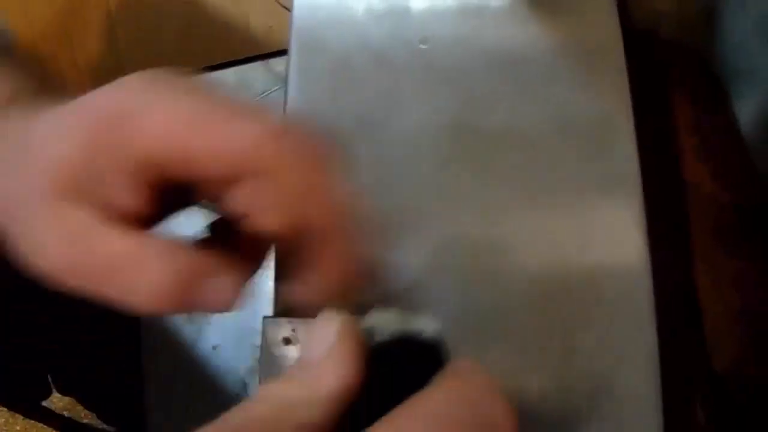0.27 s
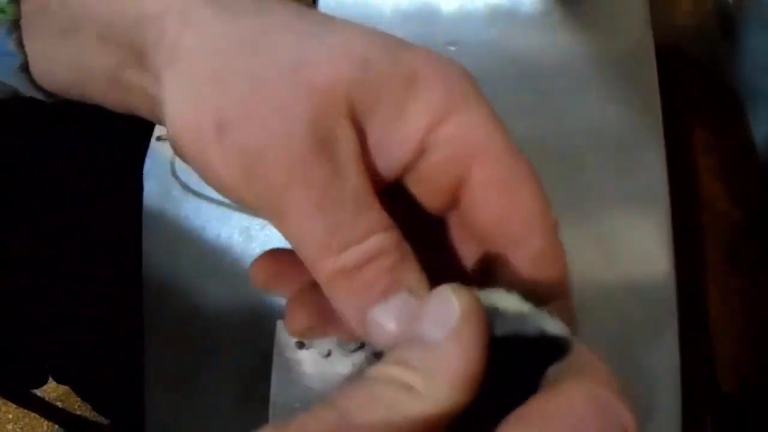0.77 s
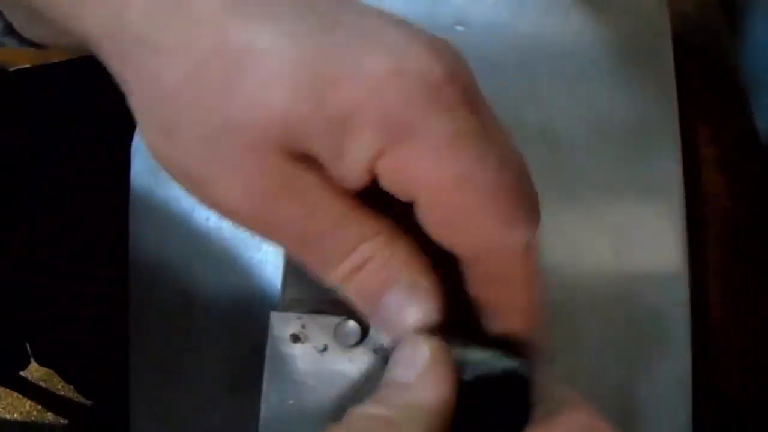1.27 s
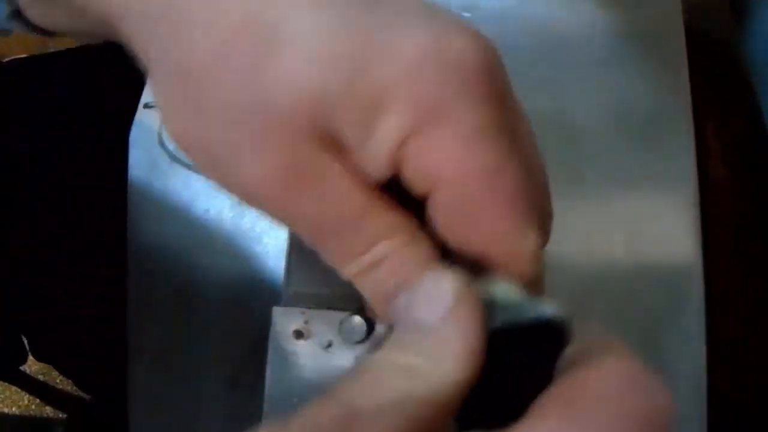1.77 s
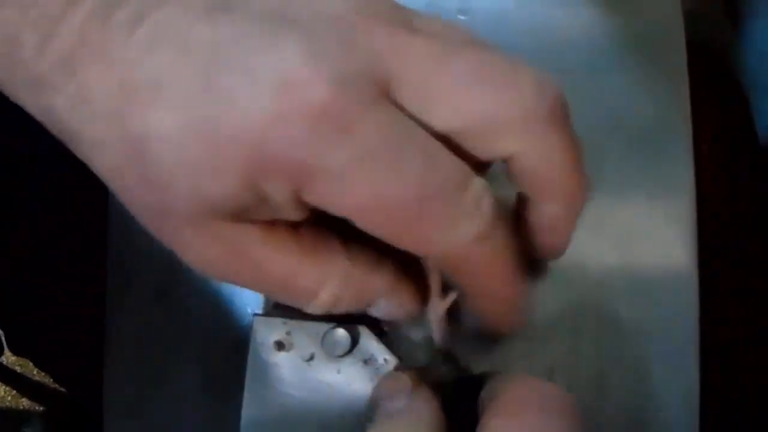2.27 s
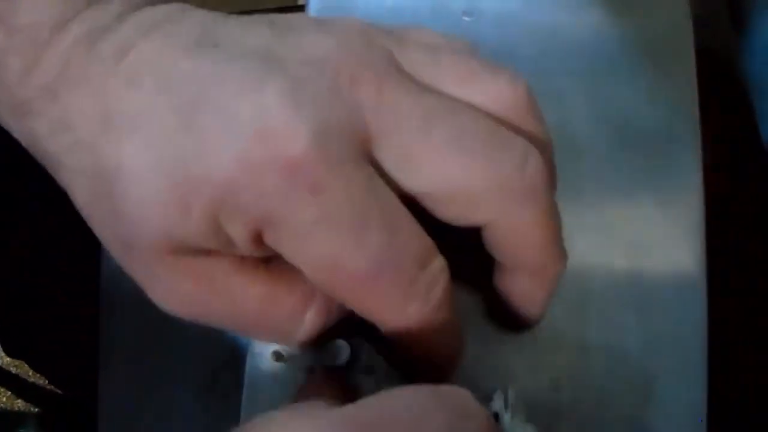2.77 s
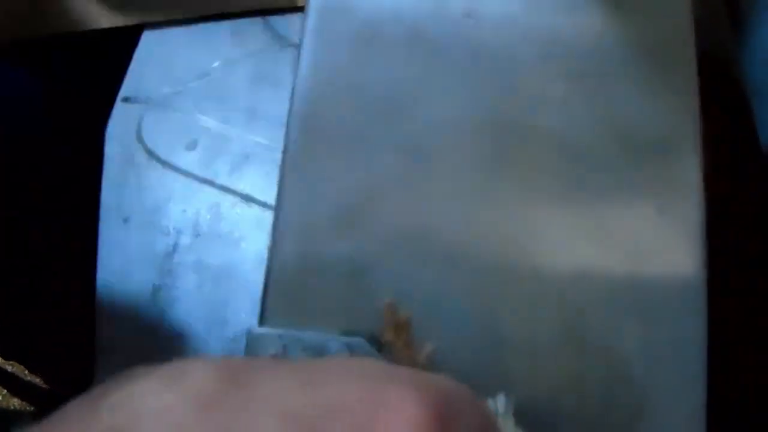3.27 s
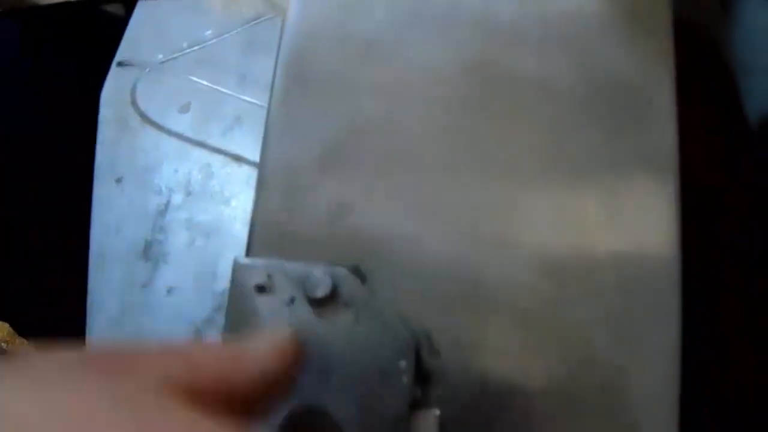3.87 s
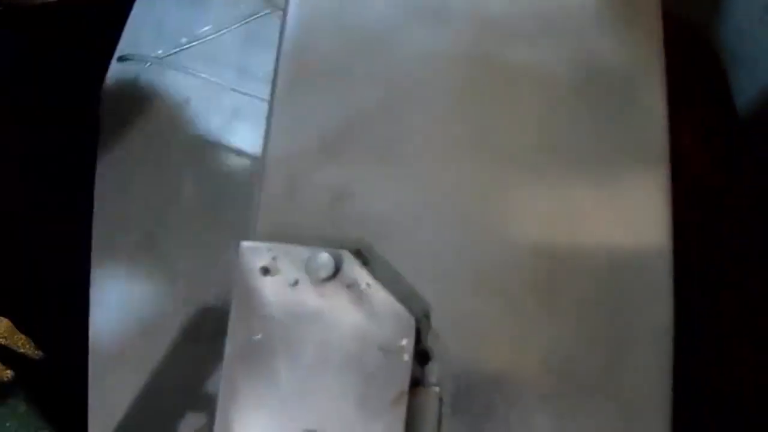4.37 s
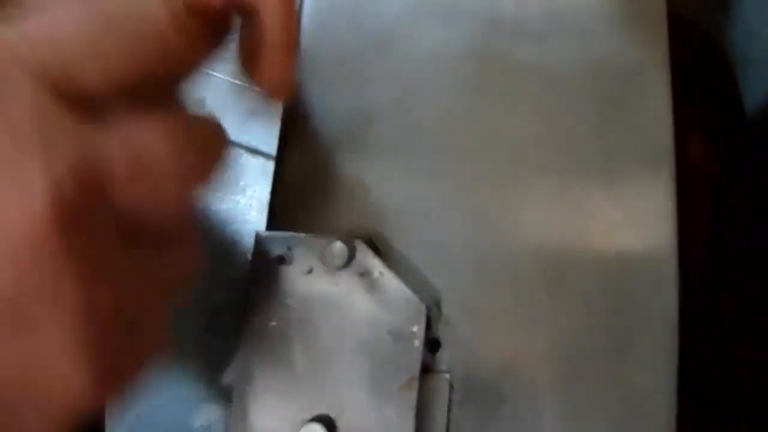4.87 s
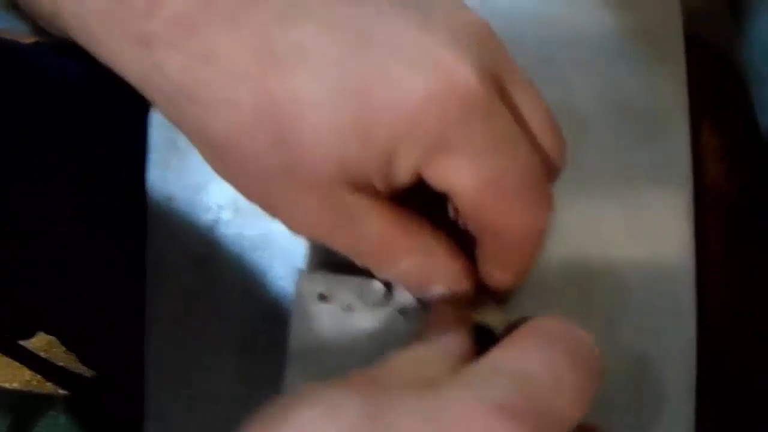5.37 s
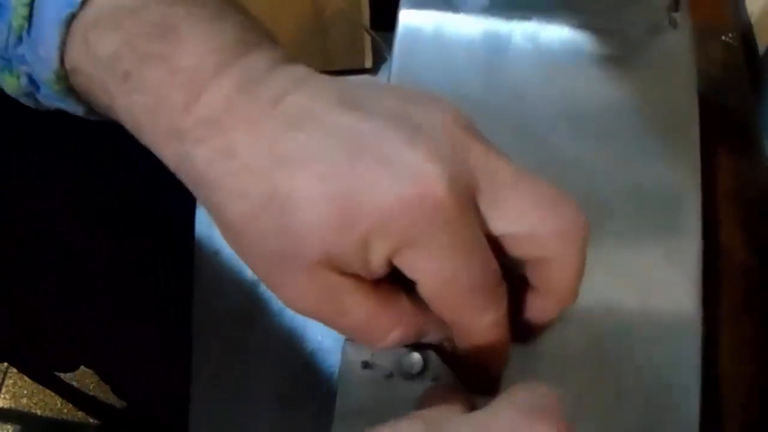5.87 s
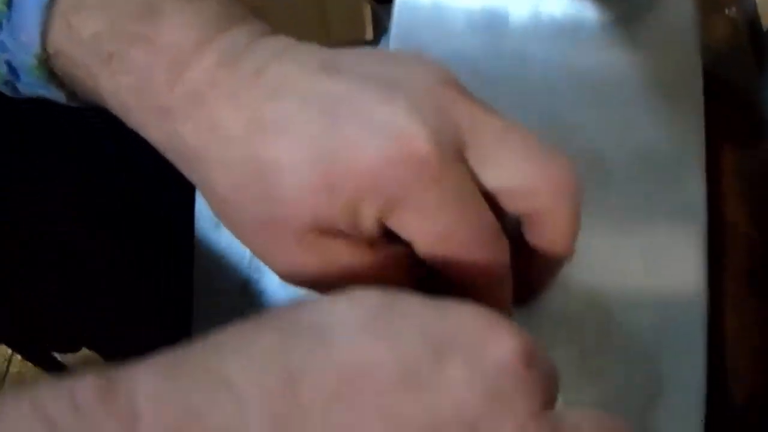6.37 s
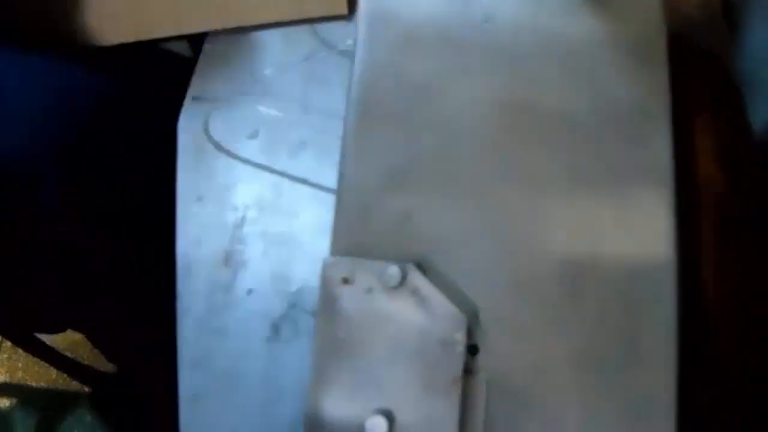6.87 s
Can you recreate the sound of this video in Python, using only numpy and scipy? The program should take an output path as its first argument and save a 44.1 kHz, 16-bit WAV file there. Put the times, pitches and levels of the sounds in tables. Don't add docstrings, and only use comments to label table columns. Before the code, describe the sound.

Thin falling chick whistles and hoarse squeezed cries over a faint flock, as hands rustle, bump cardboard and rap a metal bench indoors.

```python
import sys
import numpy as np
from scipy import signal
from scipy.fft import rfft, irfft, next_fast_len
from scipy.io import wavfile

SR = 44100
rng = np.random.default_rng(int(sys.argv[2]) if len(sys.argv) > 2 else 0)


def unload_audio(sound):
    columns = np.transpose(np.atleast_2d(sound))
    steps = np.round(np.clip(columns, -1, 1) * 32767)
    wavfile.write(sys.argv[1], SR, steps.astype(np.int16))


def ratio_of_db(decibels):
    return 10 ** (np.asarray(decibels, float) / 20)


N = 314433


def rms_one(x):
    return x / np.sqrt(np.mean(x ** 2) + 1e-20)


def drift(rate_hz, size=N):
    r = np.exp(-2 * np.pi * rate_hz / SR)
    noise = rng.standard_normal(size + 9000)
    return rms_one(signal.lfilter([1], [1, -2 * r, r * r], noise)[9000:])


def at_hz(points, hz):
    table_hz, value = np.transpose(points)
    return np.interp(np.log(hz), np.log(table_hz), value)


def coloured(x, spectrum):
    size = next_fast_len(len(x))
    hz = np.maximum(np.fft.rfftfreq(size, 1 / SR), 10)
    return rms_one(irfft(rfft(x, size) * ratio_of_db(at_hz(spectrum, hz)), size)[:len(x)])


def filtered(x, order, hz, kind="low"):
    return signal.sosfilt(signal.butter(order, hz, kind, fs=SR, output="sos"), x)


def resonance(x, hz, width_hz):
    r = np.exp(-np.pi * width_hz / SR)
    poles = [1, -2 * r * np.cos(2 * np.pi * hz / SR), r * r]
    return signal.lfilter([(1 - r * r) / 2, 0, (r * r - 1) / 2], poles, x)


def bursts(events, rise_s, t60_s):
    out = np.zeros(N + SR)
    age_s = np.arange(SR) / SR
    for start_s, level_db in events:
        out[round(start_s * SR):][:SR] += ratio_of_db(level_db - 60 * age_s / t60_s) * np.clip(age_s / rise_s, 0, 1)
    return out[:N]


# frequency in Hz, level in dB per Hz.
AIR = [(18, -67), (30, -7), (148, 1.5), (197, -7.5), (256, -5), (606, -9.5), (1550, -23), (3590, -8),
       (6210, -64), (9680, -8), (15500, -55)]
# frequency in Hz, level in dB rms.
HUM = [(199.6, -50.5), (400, -67), (2000, -64.5), (2200, -80)]
# frequency in Hz, width in Hz, level in dB rms.
FAN = [(39.2, 11, -51), (137, 23, -65)]


def background():
    t = np.arange(N) / SR
    out = ratio_of_db(-49) * coloured(rng.standard_normal(N), AIR)
    for hz, level_db in HUM:
        out += np.sqrt(2) * ratio_of_db(level_db + 1.2 * drift(5.5)) * np.sin(2 * np.pi * hz * t)
    noise = rng.standard_normal(N)
    for hz, width_hz, level_db in FAN:
        drone = resonance(resonance(noise, hz, width_hz), hz, width_hz)
        out += ratio_of_db(level_db) * rms_one(drone)
    return out


def room(x, far):
    t60_s, tail_db, early_db = 0.27, -11.5, -15
    t = np.arange(int(.8 * SR)) / SR
    tail = rng.standard_normal(len(t)) * ratio_of_db(-60 * t / t60_s) * np.clip(t / 0.012, 0, 1)
    tail = filtered(tail, 1, 6500)
    early = rng.standard_normal(len(t)) * ratio_of_db(-60 * t / .07) * (rng.random(len(t)) < .2)
    tail, early = tail / np.linalg.norm(tail), early / np.linalg.norm(early)
    diffuse = signal.fftconvolve(ratio_of_db(tail_db) * x + far, tail)
    close = ratio_of_db(early_db) * signal.fftconvolve(x, early)
    return (diffuse + close)[:N]


def far_flock(count=200):
    peeps = []
    for when, length, top, fall, loud in rng.random((count, 5)):
        start_s, length_s = when * (N / SR - .15), .05 + .09 * length
        top_hz, level_db = 3500 + 1500 * top, 8.3 * loud
        peeps.append([(start_s, .93 * top_hz, level_db - 37.0),
                      (start_s + 0.32 * length_s, top_hz, level_db),
                      (start_s + length_s, top_hz * (.68 + .15 * fall), level_db + 8.5)])
    return rms_one(chicks(peeps, overtone_db=-37.0, hoarse=0.21, echo_db=1.0))


# frequency in Hz, level in dB per Hz.
RUSTLE = [(880, 1), (1500, -3), (2970, -0.5), (3510, -0.5), (4060, 1.5), (6010, -1), (8880, 6),
          (15500, -11)]
# start in seconds, peak in dB.
SCUFFS = [(0.5352, -38), (0.55, -40), (1.114, -36.5), (1.345, -45), (1.37, -35), (1.395, -35), (1.42, -40),
          (1.58, -41), (1.6, -32), (1.668, -33), (1.75, -35), (2.23, -28), (1.8307, -32.5), (3.03, -42),
          (3.1, -41), (3.335, -40), (3.3533, -21), (3.535, -32), (3.9315, -24), (4.0, -31), (4.1555, -39.5),
          (4.5506, -31), (5.3487, -37), (5.7568, -38), (0.24, -39.5), (6.2243, -37), (6.2856, -26),
          (6.5794, -44), (3.6314, -39), (6.871, -21)]
# start in seconds, peak in dB.
TICKS = [(1.663, -27), (1.672, -33), (0.285, -38), (0.325, -39), (1.681, -33), (2.126, -28), (2.135, -27),
         (5.196, -28), (5.77, -42), (3.633, -29), (3.648, -22), (3.660, -25), (3.568, -38), (5.122, -26),
         (6.534, -32), (6.566, -42), (6.581, -20), (6.593, -27), (6.294, -30), (6.302, -42)]


def rustle(level_db):
    grains = rng.standard_normal(N) * ratio_of_db(2.3 * drift(190) + 2.0 * drift(5.6))
    grains = filtered(coloured(grains, RUSTLE), 2, 800, "high")
    crackle = filtered(grains * ratio_of_db(1.2 * drift(150)), 1, 9700)
    scuffs = ratio_of_db(4.5) * bursts(SCUFFS, rise_s=.004, t60_s=0.12)
    ticks = bursts(TICKS, rise_s=0.0008, t60_s=.022)
    return grains * ratio_of_db(level_db + 2.5) + crackle * (scuffs + ticks)


# start in seconds, peak in dB.
THUDS = [(1.41, -51), (1.659, -26), (3.35, -12.5), (3.531, -28), (3.627, -15), (3.927, -43), (5.558, -52),
         (5.699, -22.5), (5.71, -35), (6.254, -28), (6.281, -12.5), (6.562, -11.5), (6.579, -33),
         (6.592, -26), (3.646, -20)]
# frequency in Hz, width in Hz, level in dB.
BOX = [(165, 102, 6.5), (230, 600, -20), (460, 330, 9.5), (815, 140, 2.5)]


def thuds():
    noise = rng.standard_normal(N)
    body = sum(ratio_of_db(level_db) * rms_one(resonance(noise, hz, width_hz)) for hz, width_hz, level_db in BOX)
    body = filtered(body, 4, 110, "high")
    body = filtered(body, 2, 1100)
    return rms_one(body) * ratio_of_db(-6.0 + 0.63 * drift(31)) * bursts(THUDS, rise_s=0.0062, t60_s=0.11)


# start in seconds, peak in dB.
KNOCKS = [
    (3.3532, -10),
    (6.271, -24),
    (6.286, -12),
    (6.294, -19),
]
# frequency in Hz, level in dB, t60 in seconds.
BENCH = [(800, -8, .018), (1150, -8, .01), (2200, -12, .012), (2680, 8, .012), (3880, -17, .025),
         (4790, -12, .008), (7600, -14, .01), (9000, -14, .01)]


def knocks():
    bounces_s_db = [(0, -7), (.0013, -4), (.0028, -1), (.0062, -12), (.009, -12), (.015, -15)]
    out = np.zeros(N)
    for hz, level_db, t60_s in BENCH:
        clicks = np.full(N, 1e-18)
        for start_s, blow_db in KNOCKS:
            for lag_s, bounce_db in bounces_s_db:
                click_db = blow_db + level_db + bounce_db + 2 * rng.standard_normal()
                clicks[round((start_s + lag_s) * SR)] += ratio_of_db(click_db)
        r, w = ratio_of_db(-60 / (t60_s * SR)), 2 * np.pi * hz / SR
        out += signal.lfilter([0, np.sin(w)], [1, -2 * r * np.cos(w), r * r], clicks)
    return out


def arch(t, s, hz):
    step = np.diff(hz) / np.diff(s)
    before, after = step[:-1], step[1:]
    inner = np.where(before * after > 0, 2 * before * after / (before + after + 1e-9), 0)
    slope = np.r_[step[0], inner, step[-1]]
    k = np.clip(np.searchsorted(s, t) - 1, 0, len(s) - 2)
    span = np.diff(s)[k]
    u = np.clip((t - s[k]) / span, 0, 1)
    ease = u * u * (3 - 2 * u)
    bend = span * u * (1 - u) * (slope[k] * (1 - u) - slope[k + 1] * u)
    return hz[k] + (hz[k + 1] - hz[k]) * ease + bend


# the octave's own frequency in Hz, level under the whistle in dB.
OVERTONE = [(5500, -24), (7200, -24), (9000, -22), (10500, -20), (12000, -19)]


def whistle(rows, overtone_db, hoarse, echo_db, low_octave_db=0):
    s, hz, level_db = np.transpose(rows)
    start = round(s[0] * SR)
    t = np.arange(start, min(round(s[-1] * SR), N)) / SR
    pitch_hz = arch(t, s, hz)
    phase = 2 * np.pi * np.cumsum(pitch_hz + 32 * drift(110, size=len(t))) / SR
    dropped = np.clip((4300 - pitch_hz) / 600, 0, 1)
    octave_db = overtone_db + low_octave_db * dropped + at_hz(OVERTONE, 2 * pitch_hz)
    octave = ratio_of_db(octave_db + 2.5 * drift(60, size=len(t)))
    tone = np.sin(phase) + octave * np.sin(2 * phase)
    tone = tone * (1 + hoarse * drift(310, size=len(t)))
    edges = np.clip(np.minimum(t - t[0], t[-1] - t) / 0.0019, 0, 1)
    loudness = ratio_of_db(np.interp(t, s, level_db) + 1.3 * drift(45, size=len(t)))
    call = np.sqrt(2) * tone * edges * loudness
    taps = np.zeros(400)
    echoes = rng.integers(25, 400, 5)
    taps[echoes] = ratio_of_db(echo_db + 2 * rng.standard_normal(5)) * rng.choice([-1, 1], 5)
    taps[0] = 1
    return start, signal.fftconvolve(call, taps / np.linalg.norm(taps))


def chicks(peeps, overtone_db, hoarse, echo_db, low_octave_db=0):
    out = np.zeros(N + SR)
    for rows, boost_db in zip(peeps, np.broadcast_to(low_octave_db, len(peeps))):
        start, call = whistle(rows, overtone_db, hoarse, echo_db, boost_db)
        out[start:start + len(call)] += call
    return out[:N]


def shaped(calls, shape):
    phase, share, shape_db = np.transpose(shape)
    return [np.c_[np.interp(phase, range(3), (start_s, knee_s, end_s)), share * top_hz, level_db + shape_db]
            for start_s, knee_s, end_s, top_hz, level_db in calls]


def long_calls(calls, shape, fall_s):
    falling = np.transpose(shape)[0] > 1
    peeps = []
    for start_s, knee_s, top_hz, held_db, fall_db in calls:
        level_db = np.where(falling, fall_db, held_db)
        peeps += shaped([(start_s, knee_s, knee_s + fall_s, top_hz, level_db)], shape)
    return peeps


# phase (0 start, 1 knee, 2 end), share of top pitch, level in dB.
SLIDE_SHAPE = [(0, 1.001, -8.5), (1.001, .88, -0.5), (1.599, .71, -2), (2.0, 0.58, -14.5)]
RISE_SHAPE = [(0, 0.87, 0), (1.0, 1.04, -0.5), (2.0, 1.001, 0)]
# start, knee and end in seconds, top in Hz, level in dB.
SLIDES = [(0.095, 0.135, 0.142, 5650, -30.5), (0.262, 0.283, 0.31, 3740, -36),
          (0.12, 0.135, 0.142, 4850, -30), (0.551, 0.61, 0.652, 4255, -33.5),
          (0.88, 0.94, 1.0, 4370, -31.5), (1.245, 1.262, 1.3, 3760, -39), (1.7, 1.766, 1.8, 4190, -31),
          (1.99, 2.012, 2.07, 5100, -34.5), (2.08, 2.135, 2.18, 4310, -27),
          (2.974, 2.984, 2.998, 3894, -31), (3.02, 3.055, 3.09, 4150, -39), (3.62, 3.627, 3.634, 5260, -36),
          (3.661, 3.73, 3.77, 4250, -40.5), (3.83, 3.852, 3.885, 5280, -37),
          (0.65, 0.675, 0.705, 3760, -39), (1.09, 1.12, 1.16, 3770, -56), (2.468, 2.482, 2.49, 4960, -33),
          (4.62, 4.67, 4.72, 4260, -47), (6.762, 6.79, 6.85, 4230, -40.5), (5.15, 5.185, 5.2, 3660, -39),
          (1.38, 1.4, 1.42, 3920, -32), (0.18, 0.195, 0.205, 3600, -29.5), (1.16, 1.19, 1.2, 3470, -50),
          (4.405, 4.425, 4.48, 4270, -30.5), (5.484, 5.505, 5.53, 4380, -29),
          (7.005, 7.055, 7.09, 4410, -33.5)]
# start, knee and end in seconds, top in Hz, level in dB.
RISES = [
    (3.155, 3.165, 3.194, 4430, -40),
    (3.88, 3.893, 3.93, 5220, -31),
    (3.935, 3.948, 3.96, 4350, -24),
]
# time in seconds, pitch in Hz, level in dB.
WARBLES = [
    [(7.066, 4600, -35), (7.078, 4850, -39), (7.1, 4730, -44), (7.128, 5120, -44)],
    [(4.095, 5660, -40), (4.11, 5340, -40), (4.128, 5000, -37)],
    [(0.17, 3730, -33), (0.187, 3730, -28), (0.215, 3630, -44), (0.245, 3780, -34)],
    [(4.075, 4150, -44), (4.1, 3950, -31), (4.127, 3990, -28), (4.135, 3700, -36), (4.145, 3100, -38),
     (4.165, 2400, -46)],
    [(4.13, 4030, -35), (4.145, 3800, -38), (4.165, 3500, -44), (4.18, 3340, -37)],
    [(4.78, 4510, -33), (4.802, 4550, -30), (4.812, 4300, -31), (4.828, 3900, -29), (4.846, 4050, -32),
     (4.852, 4000, -40)],
    [(4.37, 5700, -48), (4.395, 5470, -40), (4.425, 5350, -39)],
    [(1.34, 3790, -32), (1.355, 3690, -33), (1.372, 3570, -34)],
]


def boxed_chicks():
    peeps = shaped(SLIDES, SLIDE_SHAPE) + shaped(RISES, RISE_SHAPE) + WARBLES
    return chicks(peeps, overtone_db=5, hoarse=0.3, echo_db=-7)


# phase (0 start, 1 knee, 2 end), share of top pitch, level in dB.
SHRILL_SHAPE = [(0, .84, -23), (.2, .98, 0), (.6, 1.001, 1.5), (.72, 1.001, 4.5), (1.001, .99, 1.5),
                (1.121, .9, -7.5), (1.272, .79, 5.5), (1.4, .68, -12.5), (1.499, .62, 3), (2.0, 0.45, -17)]
ARCH_SHAPE = [(0, .9, -16), (0.501, 1.1, -12), (1.0, 1.1, -1), (1.298, .85, -1), (1.7, .62, -0.5),
              (2.0, 0.5, -46)]
# start and knee in seconds, top in Hz, held and falling levels in dB.
SHRILL_CALLS = [
    (5.08, 5.21, 5960, -29, -18),
    (5.44, 5.552, 5994, -25, -15),
]
# start, knee and end in seconds, top in Hz, level in dB.
ARCHES = [
    (5.235, 5.269, 5.316, 4510, -20),
]
# time in seconds, pitch in Hz, level in dB.
SHRILL_CRIES = [
    [(4.445, 4300, -36), (4.46, 5690, -27), (4.49, 6080, -10.5), (4.508, 5950, -13.5), (4.535, 6055, -17),
     (4.557, 5230, -29)],
    [(4.559, 5470, -21), (4.563, 5510, -16), (4.575, 5300, -32), (4.586, 4640, -29), (4.59, 3380, -47),
     (4.598, 2830, -42)],
    [(6.628, 4490, -43), (6.65, 5560, -28.5), (6.688, 5806, -20.5), (6.745, 5674, -21.5), (6.75, 5500, -28),
     (6.772, 5510, -28), (6.779, 4990, -24.5), (6.79, 3240, -35), (6.805, 2600, -48)],
    [(5.871, 5426, -51), (5.92, 5645, -28), (6.024, 5990, -21.5), (6.03, 5235, -26), (6.037, 4415, -9.5),
     (6.041, 3690, -20), (6.06, 2680, -33)],
    [(6.251, 5060, -31), (6.296, 5860, -23), (6.371, 6050, -27.5), (6.39, 5250, -21), (6.397, 4870, -26),
     (6.406, 4290, -6), (6.411, 3460, -27), (6.418, 3260, -21), (6.426, 2920, -36)],
]
# time in seconds, pitch in Hz, level in dB.
BEADED_FALLS = [
    [(6.83, 3950, -37), (6.86, 4620, -30), (6.895, 4570, -21), (6.915, 4120, -18.5), (6.92, 3760, -21),
     (6.925, 3460, -19.5), (6.935, 2990, -22), (6.958, 2190, -42)],
    [(1.75, 4920, -34), (1.765, 5114, -29), (1.78, 4800, -19.5), (1.79, 3806, -23), (1.795, 3380, -21),
     (1.80, 3030, -21.5), (1.812, 2330, -31), (1.82, 2050, -41)],
    [(5.645, 4500, -34), (5.665, 5000, -27), (5.69, 4543, -20.5), (5.708, 3980, -18.5),
     (5.712, 3570, -18.5), (5.717, 3260, -21), (5.74, 2500, -42)],
    [(5.995, 4190, -39), (6.025, 5173, -30), (6.055, 5097, -12.5), (6.073, 4590, -16), (6.082, 4170, -13.5),
     (6.089, 3650, -19.5), (6.095, 3360, -9.5), (6.102, 2770, -29)],
    [(6.418, 5360, -28), (6.434, 5500, -18.5), (6.44, 4830, -19.5), (6.446, 4325, -14.5),
     (6.455, 3840, -15), (6.463, 3350, -24), (6.47, 3016, -13.5), (6.487, 2300, -40)],
]


def shrill_chick():
    peeps = long_calls(SHRILL_CALLS, SHRILL_SHAPE, fall_s=.047) + shaped(ARCHES, ARCH_SHAPE)
    peeps = peeps + SHRILL_CRIES[2:] + BEADED_FALLS
    free = chicks(peeps, overtone_db=2, hoarse=0.2, echo_db=-12)
    return free + chicks(SHRILL_CRIES[:2], overtone_db=6, hoarse=0.15, echo_db=-14)


# time in seconds, pitch in Hz, level in dB.
TWITTERS = [
    [(0.722, 4087, -36), (0.732, 4660, -25.5), (0.74, 4080, -26), (0.748, 3690, -19.5), (0.76, 4016, -18.5),
     (0.77, 3380, -25.5), (0.777, 2440, -20.5)],
    [(1.003, 4194, -28.5), (1.022, 5023, -24), (1.032, 4750, -22), (1.042, 3570, -20.5), (1.055, 4410, -20),
     (1.063, 3545, -27), (1.071, 2320, -25.5)],
    [(1.272, 4150, -42), (1.28, 4550, -32), (1.295, 3325, -26.5), (1.303, 4190, -25.5), (1.314, 3680, -28),
     (1.319, 2860, -25), (1.326, 2100, -47)],
    [(1.888, 4213, -28), (1.903, 4500, -36), (1.912, 5050, -17), (1.931, 3370, -22.5), (1.948, 4350, -26.5),
     (1.96, 3050, -27), (1.972, 2200, -47)],
    [(2.488, 4245, -32), (2.514, 5140, -27.5), (2.527, 4247, -19), (2.535, 3316, -24), (2.55, 4350, -28),
     (2.561, 4140, -21.5), (2.568, 3020, -33.5), (2.572, 2610, -51)],
    [(1.572, 3930, -39), (1.582, 3994, -34), (1.587, 3950, -37), (1.594, 4490, -17.5), (1.601, 4700, -27),
     (1.606, 4230, -19), (1.62, 2650, -28.5), (1.625, 2420, -44)],
    [(0.436, 4340, -39), (0.452, 4665, -25), (0.46, 4420, -27.5), (0.47, 3404, -20.5), (0.484, 2310, -53)],
    [(2.341, 4400, -49), (2.366, 4740, -34), (2.385, 4050, -28.5), (2.4, 3550, -31), (2.425, 3380, -31),
     (2.445, 3000, -33.5), (2.458, 2480, -42)],
]
TRILLS = [
    [(4.178, 4006, -45), (4.189, 5250, -45), (4.198, 4530, -18.5), (4.207, 3053, -34), (4.214, 4570, -18),
     (4.225, 5750, -32), (4.235, 4900, -27), (4.246, 3160, -22)],
    [(4.246, 3170, -19), (4.255, 4240, -23.5), (4.262, 5530, -32), (4.27, 5900, -35), (4.281, 4020, -27),
     (4.294, 2726, -36.5), (4.305, 4170, -25.5), (4.308, 4240, -36)],
    [(4.735, 3960, -34), (4.757, 5365, -33), (4.77, 4550, -14.5), (4.774, 4270, -33), (4.78, 4680, -9),
     (4.784, 5100, -37), (4.799, 6030, -29.5), (4.811, 4086, -21), (4.819, 3920, -17)],
    [(4.819, 3940, -29), (4.833, 5670, -39), (4.848, 5850, -27.5), (4.855, 4070, -26), (4.864, 3216, -32),
     (4.87, 4030, -21), (4.876, 3950, -34)],
    [(4.702, 5330, -35), (4.711, 5150, -40), (4.724, 4050, -35), (4.742, 3500, -28), (4.757, 3080, -29),
     (4.765, 3950, -26)],
]
GRIPPED_CRIES = [
    [(0.062, 4560, -35), (0.078, 4684, -34), (0.097, 5010, -24), (0.106, 4960, -34), (0.114, 4730, -22),
     (0.124, 4150, -33), (0.134, 3637, -25), (0.141, 3810, -24), (0.148, 4330, -17)],
    [(0.141, 3790, -28), (0.146, 3360, -20.5), (0.155, 2470, -33)],
    [(0.154, 3490, -30), (0.16, 3720, -17), (0.166, 3240, -27), (0.176, 2900, -28)],
    [(1.341, 5570, -36), (1.362, 5600, -34), (1.368, 5600, -33), (1.385, 5550, -27), (1.396, 5400, -23)],
    [(1.366, 5000, -40), (1.392, 5067, -19.5), (1.402, 5106, -31), (1.41, 4195, -10.5), (1.415, 3734, -10),
     (1.425, 3450, -5.5), (1.429, 3240, -21), (1.442, 2800, -22), (1.452, 2020, -40)],
    [(2.772, 3820, -42), (2.791, 4840, -27.5), (2.826, 5400, -27.5), (2.837, 4726, -3.5),
     (2.857, 5220, -17), (2.869, 4755, -8.5), (2.875, 4130, -15), (2.879, 3410, -13.5), (2.884, 3500, -18)],
    [(2.886, 4260, -26), (2.892, 4520, -7.5), (2.902, 4330, -16), (2.908, 3320, -18.5), (2.92, 2670, -38),
     (2.932, 2890, -25)],
    [(2.15, 5000, -28), (2.183, 5570, -21), (2.205, 5080, -19.5), (2.221, 4884, -21.5), (2.238, 3610, -21),
     (2.25, 4070, -34), (2.261, 2900, -26.5)],
]
HELD_CALLS = [
    [(3.196, 4505, -22), (3.215, 4910, -17.5), (3.243, 5260, -20.5), (3.255, 5125, -16), (3.263, 4545, -6),
     (3.268, 3560, -31), (3.278, 3370, -19), (3.292, 2480, -45)],
    [(3.514, 4560, -48), (3.528, 4930, -21.5), (3.56, 5330, -35.5), (3.596, 5360, -26.5),
     (3.603, 4760, -11), (3.607, 3640, -30), (3.62, 3430, -28.5), (3.634, 2840, -42)],
]
HELD_OCTAVE_DB = [16, 33]


def first_chick():
    out = chicks(TWITTERS, overtone_db=3, hoarse=.17, echo_db=-14, low_octave_db=6)
    out = out + chicks(TRILLS, overtone_db=5, hoarse=.3, echo_db=-10)
    out = out + chicks(GRIPPED_CRIES[:5], overtone_db=4, hoarse=.5, echo_db=-7)
    out = out + chicks(GRIPPED_CRIES[5:], overtone_db=-3, hoarse=.15, echo_db=-15, low_octave_db=8)
    return out + chicks(HELD_CALLS, overtone_db=-5, hoarse=.1, echo_db=-20, low_octave_db=HELD_OCTAVE_DB)


# time in seconds, far flock in dB, rustle in dB.
ACTIVITY = [(0.0, -35, -40), (0.19, -39, -41.5), (0.48, -37, -54), (0.67, -33.5, -41), (1.4, -42, -46.5),
            (1.871, -31.5, -41), (2.38, -49, -45.5), (3.1, -52, -51.5), (3.95, -42.5, -48.5),
            (5.12, -53.5, -58.5), (5.32, -42, -48), (5.56, -38, -43), (5.96, -44, -51.5),
            (6.17, -40, -44.5), (6.412, -38, -35), (6.69, -49, -47.5), (7.13, -25, -45.5)]


def scene():
    s, flock_db, rustle_db = np.transpose(ACTIVITY)
    t = np.arange(N) / SR
    boxed = boxed_chicks()
    near = ratio_of_db(-0.5) * (first_chick() + shrill_chick() + boxed)
    near = near + thuds() + rustle(np.interp(t, s, rustle_db))
    flock = ratio_of_db(np.interp(t, s, flock_db) - 10.0) * far_flock()
    blows = knocks()
    far = flock + ratio_of_db(-29.0) * boxed
    near = near + ratio_of_db(-34.0) * flock
    return (near + room(near + ratio_of_db(-8.5) * blows, far) + blows + background())[None]


def roll_off(x):
    return signal.sosfilt(signal.butter(12, 15850, fs=SR, output="sos"), x)


def record(dry):
    up, down = 160, 147
    fast = signal.resample_poly(dry, up, down, axis=1)
    nearest = np.round(np.arange(N) * up / down).astype(int).clip(0, fast.shape[1] - 1)
    mix = 1.3 * np.tanh(fast[:, nearest] / 1.3)
    mix = filtered(mix, 2, 53, "high")
    mix = signal.sosfilt(signal.cheby2(16, 60, 16000, fs=SR, output="sos"), mix)
    return roll_off(mix)


dry = scene()
out = record(dry)
unload_audio(out)
```